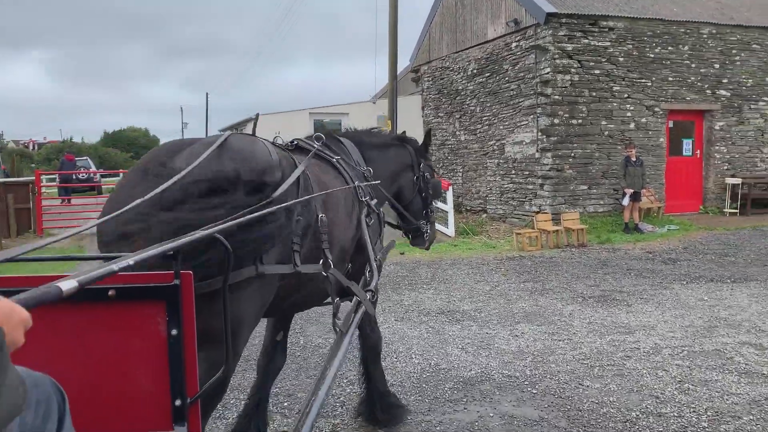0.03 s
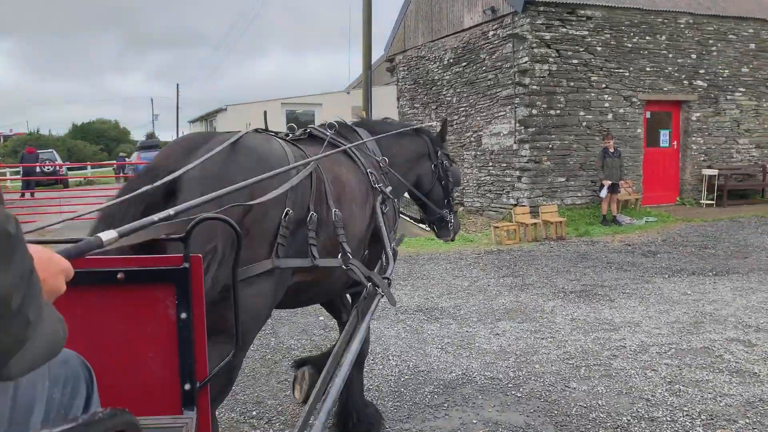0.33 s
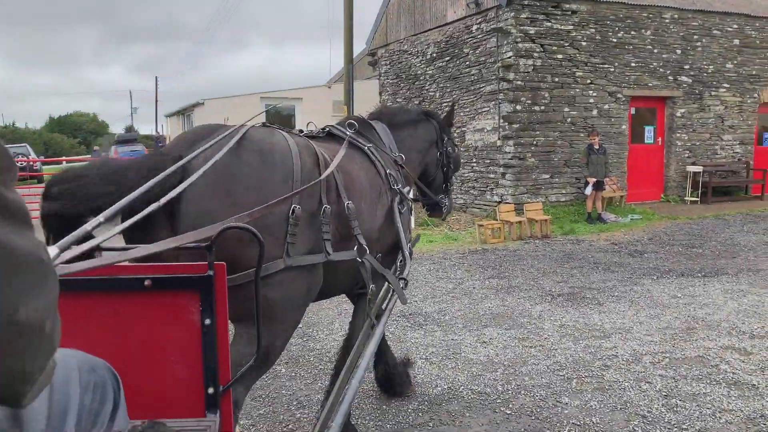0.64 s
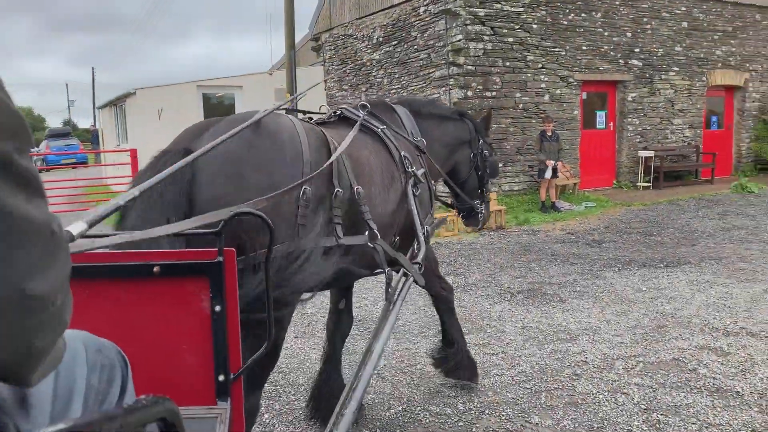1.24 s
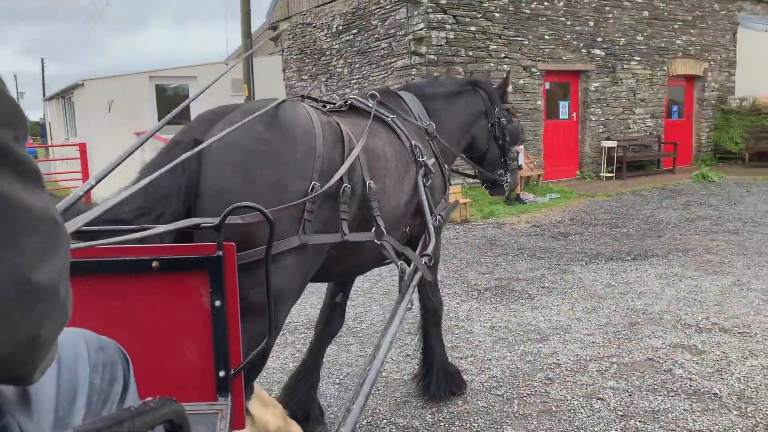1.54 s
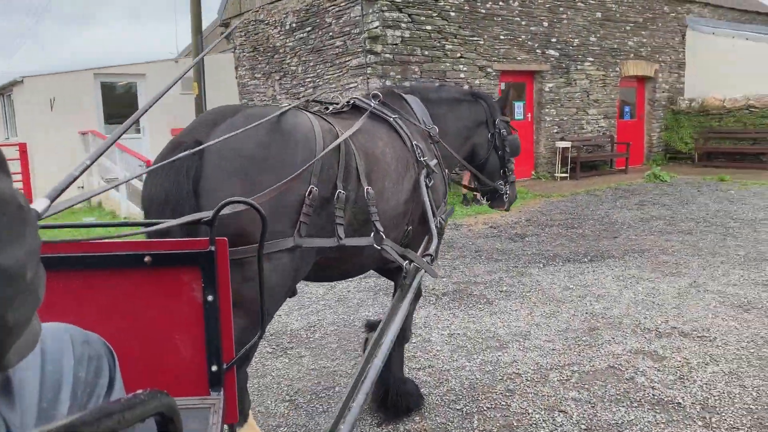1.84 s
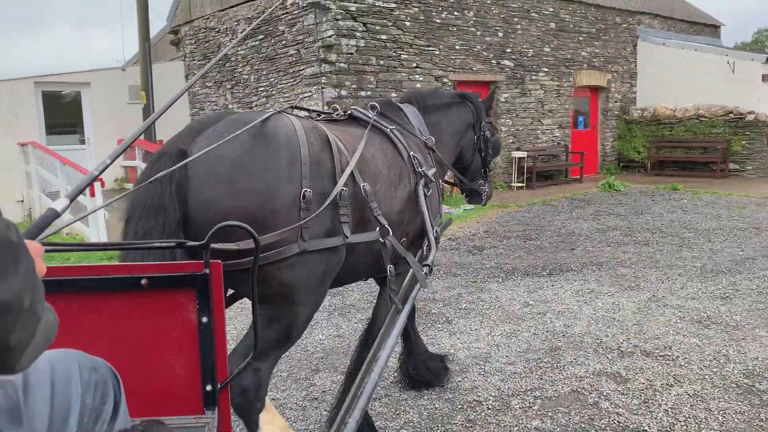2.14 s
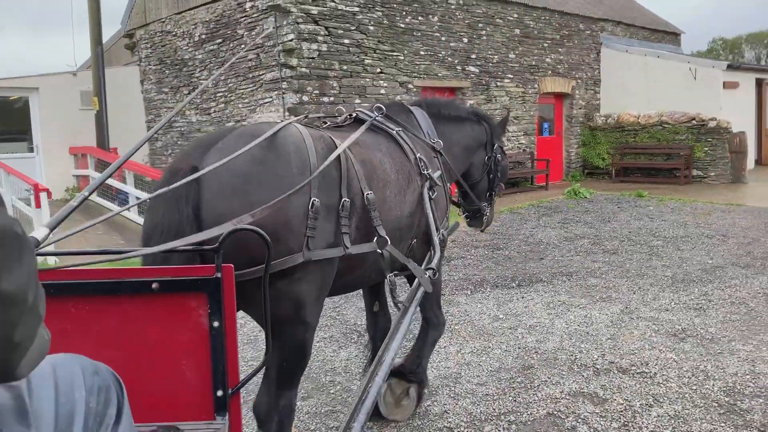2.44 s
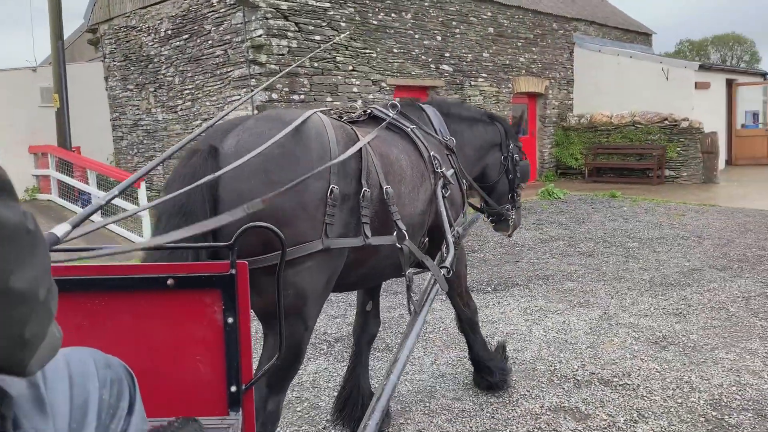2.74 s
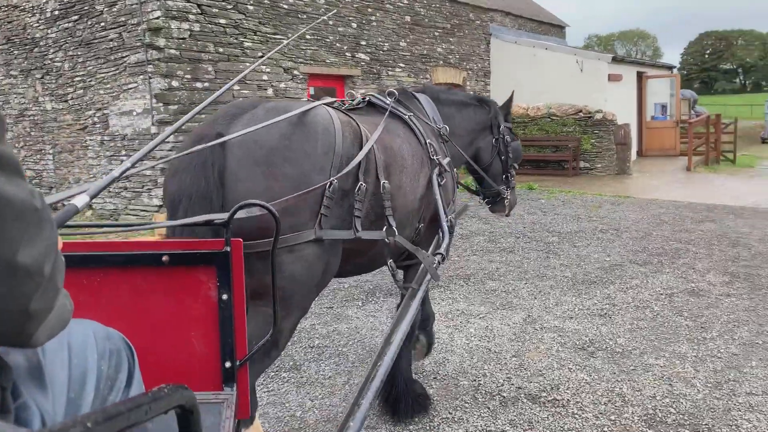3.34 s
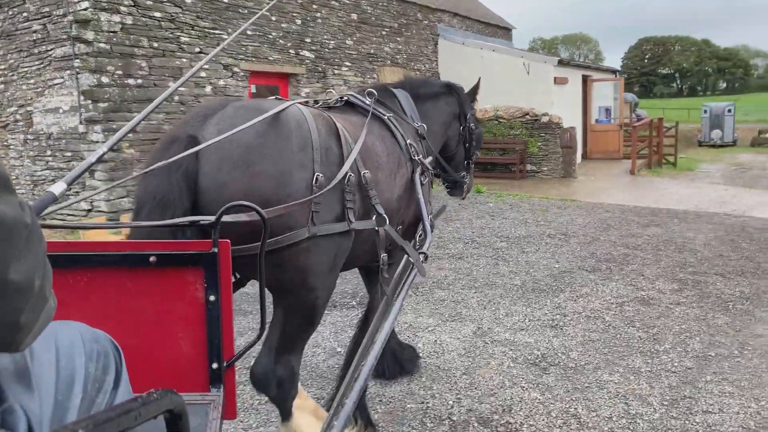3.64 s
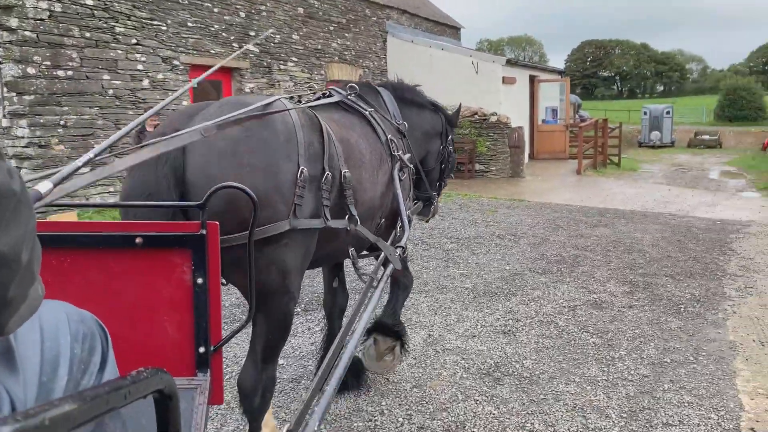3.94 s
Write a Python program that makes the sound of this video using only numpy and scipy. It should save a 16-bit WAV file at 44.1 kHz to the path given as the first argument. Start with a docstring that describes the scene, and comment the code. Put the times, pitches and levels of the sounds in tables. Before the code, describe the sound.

A horse walks on gravel throughout, each step a crunch, many with a hollow clop, the clearest near 0.3, 0.7, 1.7, 3.1 and 3.8 seconds. Pebbles snap and briefly scrape its iron shoes, while cart wheels crackle softly underneath and the yard gives a faint echo. Wind rumbles on the microphone, buffeting harder from about 1.8 seconds, with the strongest thumps near 2.2 and 3.2 seconds.

```python
"""A hoof crunches into gravel and lands with a hollow clop: a heavy horse pulls a cart across a yard
at a walk, heard from the driver's seat. Each crunch is a burst of colliding stones, each clop the
damped modes of a hoof. Stones scrape the iron shoes; pebbles snap under hooves and crackling wheels.
Turbulent wind buffets the microphone, harder in the second half; stone walls return a faint echo."""
import sys
import numpy as np
from scipy import signal
from scipy.fft import rfft, irfft
from scipy.io import wavfile
from scipy.ndimage import uniform_filter1d

SR = 44100
rng = np.random.default_rng(int(sys.argv[2]) if len(sys.argv) > 2 else 0)


def dump_mix(stems):
    """Bounce the given channels to the path in sys.argv[1] as a 16-bit WAV at rate SR."""
    frames = np.atleast_2d(stems).T  # one column per channel
    limited = np.clip(frames, -1, 1)  # hard clip at full scale
    pcm = np.round(limited * 32767).astype(np.int16)
    wavfile.write(sys.argv[1], SR, pcm)


N = 176400
T = np.arange(N) / SR
HZ = np.fft.rfftfreq(N, 1 / SR)
LEFT_RIGHT = np.array([[1], [-1]])  # opposite signs for the two channels


def crunches():
    """Source and filter: a hoof sets off dense stone impacts that ring its shoe, then settle."""
    # hooves crushing gravel: (time [s], length [s], level [dB], treble tilt [dB/octave])
    steps = [(0.0, 0.047, -38.5, 0.5), (0.2179, 0.028, -25, 0.5), (0.273, 0.04, -35, 7.5),
             (0.678, 0.013, -34, 1), (0.971, 0.038, -33, 4), (1.326, 0.014, -41, -1.5),
             (1.395, 0.034, -39, -9), (1.671, 0.055, -29.5, 2.5), (2.125, 0.026, -38, 0.5),
             (2.161, 0.017, -33, -14), (2.275, 0.0067, -35.5, -5), (2.394, 0.03, -34, 2.5),
             (2.838, 0.011, -32.5, -1.5), (3.0942, 0.03, -24, 1), (3.114, 0.044, -29, 0.5),
             (3.555, 0.037, -40.5, 4), (3.817, 0.0052, -29.5, 9.5), (3.835, 0.021, -28.5, 2.5)]
    # spectrum of crushed gravel: (frequency [Hz], level [dB])
    gravel = [(150, -18.5), (450, 9.5), (1100, 4), (1700, -0.5), (2500, -6), (3100, -4), (4400, -3),
              (5500, -10.5), (7500, -7), (10500, -16.5), (14000, -25)]
    # resonances of the iron shoe: (frequency [Hz], width [Hz], boost [dB])
    shoe = [(2215, 600, 7.5), (3474, 180, 7), (4330, 410, 3.5)]
    rise_s, fall_s, settle_s, settle_db = 0.0013, 0.0084, 0.07, -18.5
    out, t = np.zeros(N), T[:SR // 4]
    body_db = read(gravel) + sum(db / (1 + (2 * (HZ - hz) / width) ** 2) for hz, width, db in shoe)
    for start, length, db, tilt in steps:
        after = np.maximum(t - length, 0)
        decay = np.exp(-after / fall_s) + amp(settle_db) * np.exp(-after / settle_s)
        envelope = (1 - np.exp(-t / rise_s)) * decay
        impacts = stones(len(t), per_s=15000, spread_db=3, clump_db=2.5, click_db=-7.5)
        burst = colour(impacts * envelope, body_db + tilt * np.log2(HZ / 3000 + 0.13))
        add(out, start, amp(db) * unit(burst) * np.sqrt(np.mean(envelope ** 2)))
    return out


def stones(size, per_s, spread_db, clump_db, click_db):
    """Impulse-driven resonators: stones knock in clumps and ring at their own pitch; some only click."""
    pitches_hz, quality = np.geomspace(447.3, 14050, num=36), 17
    hz = np.fft.rfftfreq(size, 1 / SR) + 1
    knots_s = np.arange(0, N / SR, .03)
    spectrum = amp(click_db) * rfft(grains(size, per_s / 20, spread_db))
    for family in pitches_hz.reshape(-1, 4):  # neighbouring pitches swell together
        clump = amp(clump_db * np.interp(T[:size], knots_s, rng.standard_normal(len(knots_s))))
        for pitch in family:
            knocks = clump * grains(size, per_s / len(pitches_hz), spread_db)
            spectrum += rfft(knocks) / (1 + 1j * quality * (hz / pitch - pitch / hz))
    return unit(irfft(spectrum, size))


def clops():
    """Modal ringing: the hollow hoof lands flat and vibrates as a sum of damped sinusoids."""
    # hoof landings: (time [s], level [dB], pitch [Hz], decay by 60 dB [s])
    landings = [(.047, -26, 713, 0.036), (.2925, -15, 714, 0.049), (.306, -22, 615, 0.055),
                (.6895, -18, 790, 0.045), (.710, -27, 670, 0.018), (1.006, -27, 748, 0.046),
                (1.4245, -22, 714, 0.026), (1.704, -23, 757, 0.046), (1.724, -22.5, 742, 0.1),
                (1.739, -29.5, 723, 0.099), (2.406, -27, 707, 0.028), (3.134, -21, 762, 0.11),
                (3.843, -21, 716, 0.11), (3.908, -25.5, 700, 0.036)]
    # hoof modes: (frequency / pitch [ratio], level [dB], share of the decay time [ratio])
    modes = [(.56, -9, 0.6), (1, 2.5, 1), (1.22, -6.5, 0.24), (1.66, -8, 0.38)]
    out, t = np.zeros(N), T[:SR // 4]
    attack = 1 - np.exp(-t / 0.000043)
    for start, db, hz, t60 in landings:
        ring = sum(amp(mode_db - 60 * t / (t60 * share)) * np.sin(2 * np.pi * hz * ratio * t)
                   for ratio, mode_db, share in modes)
        add(out, start, amp(db) * ring * attack)
    return out


def scrapes():
    """Friction excitation: a stone slips along the shoe; one iron mode sings unevenly, then dies."""
    # stones grinding on iron: (time [s], length [s], peak level [dB], pitch [Hz])
    slips = [(0.194, 0.0064, -29, 1280), (.231, 0.018, -21, 2244), (0.232, .013, -35, 4540),
             (1.669, 0.023, -20, 2100), (1.699, 0.029, -30.5, 4480), (1.838, 0.002, -25.5, 3800),
             (1.841, 0.00063, -20.5, 4470), (2.832, 0.0077, -27.5, 1230), (3.094, 0.012, -18, 2157),
             (3.098, .014, -21, 2674), (3.144, 0.017, -21.5, 4290), (3.837, 0.0086, -20.5, 1420)]
    ring_s, waver = 0.0017, 0.019
    out, t = np.zeros(N), T[:SR // 10]
    for start, length, db, hz in slips:
        slip = drift(len(t), seconds=0.00079)
        envelope = np.exp(-np.maximum(t - length, 0) / ring_s) * amp(3.1 * slip)
        tone = np.sin(2 * np.pi * hz * np.cumsum(1 + waver * slip) / SR)
        add(out, start, amp(db) * envelope / envelope.max() * tone)
    return out


def snaps():
    """Impact and free vibration: a pinched pebble cracks against its neighbours, which ring briefly."""
    # single pebbles snapping: (time [s], level [dB], centre frequency [Hz])
    pebbles = [(0.0392, -23, 6400), (.277, -20, 4300), (.288, -14.5, 6400), (0.6268, -28, 4380),
               (.6895, -17, 3530), (1.242, -30, 3700), (1.3953, -25.5, 4080), (1.4232, -22, 3550),
               (1.6292, -24, 2450), (1.8391, -16, 4290), (2.1491, -20, 4400), (2.187, -22.5, 1490),
               (2.391, -16.5, 4500), (2.4063, -13, 4270), (2.5507, -30.5, 9800), (2.756, -24.5, 1140),
               (2.8461, -23.5, 3880), (2.9231, -26.5, 2170), (3.5848, -24, 5000), (3.654, -19.5, 5160),
               (3.908, -25.5, 3080)]
    crack_s, ring_s, ring_db, spread_octaves, floor_db = 0.0015, 0.0057, -15.5, 0.72, -31
    out, t = np.zeros(N), T[:SR // 10]
    for start, db, hz in pebbles:
        modes_hz = hz * 2 ** (spread_octaves * rng.uniform(-1, 1, size=(6, 1)))
        ring = unit(np.sin(2 * np.pi * modes_hz * t).sum(0)) * np.exp(-t / ring_s)
        band_db = np.maximum(-3 * (np.log2((HZ + 1) / hz) / spread_octaves) ** 2, floor_db)
        crack = colour(rng.standard_normal(len(t)) * np.exp(-t / crack_s), band_db)
        add(out, start, amp(db) * (crack / abs(crack).max() + amp(ring_db) * ring))
    return out


def wheels():
    """Rolling noise: the wheels press an uneven crackle and a hiss out of the gravel."""
    # strength of the rolling noise: (time [s], level [dB])
    rolling = [(0, -58.5), (.15, -43.5), (.38, -42.5), (.58, -48.5), (.8, -50), (.92, -46), (1.15, -48),
               (1.3, -46), (1.5, -46), (1.65, -41.5), (2.0, -48.5), (2.3, -44), (2.65, -51), (3.0, -44),
               (3.35, -42.5), (3.5, -47.5), (3.75, -41), (4, -42.5)]
    # spectrum of gravel under the wheels: (frequency [Hz], level [dB])
    spectrum = [(100, -23), (300, 3), (700, 7.5), (1000, 1.5), (1280, 7), (1700, -0.5), (2300, 0.5),
                (3300, -8.5), (4300, -6), (6000, -12), (9500, -16), (14000, -25.5)]
    crackle = stones(N, per_s=4500, spread_db=3, clump_db=8.5, click_db=-24)
    hiss = amp(-5) * rng.standard_normal(N)
    return level(rolling) * unit(colour(crackle + hiss, read(spectrum)))


def wind():
    """Turbulent pressure follows the gusts, only partly coherent between the microphone's two ports."""
    # gusts at the microphone: (time [s], level [dB])
    gusts = [(0, -31), (.32, -29.5), (.52, -43.5), (.76, -45), (.82, -37.5), (1.1, -31.5), (1.5, -42),
             (1.76, -34.5), (1.8, -19.5), (1.95, -22), (2.07, -26.5), (2.19, -10), (2.26, -31),
             (2.37, -22.5), (2.47, -31), (2.8, -23.5), (3.08, -28), (3.22, -16), (3.38, -27), (3.58, -19.5),
             (3.68, -30.5), (3.92, -22)]
    # single strong buffets: (time [s], level [dB], starting pitch [Hz])
    thumps = [(.024, -17.5, 333), (1.422, -25, 765), (1.573, -23.5, 306), (1.787, -21, 540),
              (1.847, -19, 463), (1.937, -22, 472), (2.012, -12, 439), (2.049, -31.5, 670),
              (2.103, -14.5, 490), (2.168, -11.5, 523), (2.188, -11, 392), (2.297, -23.5, 700),
              (2.338, -18, 426), (2.372, -17, 303), (2.595, -23.5, 676), (2.932, -18.5, 480),
              (3.199, -9, 266), (3.243, -13.5, 449), (3.266, -10.5, 260), (3.547, -12.5, 547),
              (3.576, -20, 608), (3.61, -14.5, 720), (3.984, -14, 810)]
    common = level(gusts) * turbulence()
    for start, db, hz in thumps:
        add(common, start, amp(db) * buffet(hz))
    opposed = amp(-10) * level(gusts) * turbulence()
    return common + LEFT_RIGHT * opposed


def buffet(start_hz):
    """Pressure pulse: a large eddy hits the microphone with a ragged thump that sinks in pitch."""
    rise_s, fall_s, sag_s, end_hz, roughness = 0.0038, 0.011, 0.00755, 66, 0.4
    t = T[:SR // 8]
    pitch = end_hz + (start_hz - end_hz) * np.exp(-t / sag_s)
    tone = np.sin(2 * np.pi * np.cumsum(pitch) / SR)
    envelope = (1 - np.exp(-(t / rise_s) ** 2)) * np.exp(-t / fall_s)
    return envelope / envelope.max() * (tone + roughness * drift(len(t), seconds=0.92 / start_hz))


def turbulence():
    """Random pressure fluctuation: a low rumble under a dense flutter of small eddies."""
    # spectrum of the wind's rumble: (frequency [Hz], level [dB])
    spectrum = [(20, -32), (40, -8), (65, 2), (115, -4.5), (170, -16), (280, -21), (450, -30), (800, -46),
                (2000, -78.5)]
    eddies_per_s, eddy_db = 260, -4.5
    rumble = irfft(rfft(rng.standard_normal(N)) * amp(read(spectrum)), N)
    speeds = np.geomspace(.5, 1.7, num=8)
    flutter = np.zeros(N)
    for speed in speeds:
        arrivals = grains(N, eddies_per_s / len(speeds), spread_db=3.2)
        flutter += signal.oaconvolve(arrivals, eddy(speed))[:N]
    return unit(rumble) + amp(eddy_db) * unit(flutter)


def eddy(speed):
    """Time scaling: a small eddy is a blip of a cycle or two, shorter and higher the faster it passes."""
    start_hz, decay_s = 335.7, 0.0022  # at a relative speed of 1
    t = T[:SR // 16] * speed
    envelope = t / decay_s * np.exp(-t / decay_s)
    return envelope * np.sin(2 * np.pi * start_hz * t / (1 + t / 0.023)) / speed


def yard(x):
    """Reverberation: the stone walls return a decaying tail, different on each side."""
    low_decay, high_decay = (200, 0.8), (1000, .24)  # (frequency [Hz], decay by 60 dB [s])
    hz, t, noise = signal.stft(rng.standard_normal((2, SR // 2)), SR, nperseg=256)
    t60 = read([low_decay, high_decay], hz)[:, None]
    envelope = amp(-60 * t / t60) * np.minimum(t / 0.0058, 1)
    tail = signal.istft(noise * envelope, SR, nperseg=256)[1]
    return signal.fftconvolve(x[None], tail / np.linalg.norm(tail[0]), axes=1)[:, :N]


def ports(x):
    """Path difference: scattered stones and their echo reach each port with their own phase and level."""
    # phase of sound from the ground ahead: (frequency [Hz], lead of the left port [rad])
    phase = [(200, .1), (1000, .6), (1800, 1.4), (4300, 1.3), (7700, 2.1), (9400, 0), (13600, -6.1),
             (15700, -8)]
    # balance of the ports: (frequency [Hz], left minus right [dB])
    balance = [(300, 1), (1600, -1.5), (2300, -0.5), (4400, -4.5), (7000, -0.5)]
    # part of the sound that differs between the ports: (frequency [Hz], level [dB])
    incoherence = [(300, -7), (4300, -5.5), (9000, -15)]
    echo_db = -15.5
    hz, _, frames = signal.stft(x, SR, nperseg=128)
    random_phase = np.exp(2j * np.pi * rng.random(frames.shape[::-1]).T)
    scattered = frames * random_phase * amp(read(incoherence, hz))[:, None]
    scatter = signal.istft(scattered, SR, nperseg=128)[1][:N]
    arriving = x + LEFT_RIGHT * scatter + amp(echo_db) * yard(x)
    response = amp(LEFT_RIGHT * read(balance) / 2) * np.exp(.5j * LEFT_RIGHT * read(phase))
    return irfft(rfft(arriving) * response, N)


def wind_filter(x):
    """Side-channel high-pass: as strong rumble accumulates, sound folds to mono below a rising corner."""
    bass_hz, threshold_db, rest_hz, growth = 200, -27, 45, 3600
    mid, side = x.mean(0), (x[0] - x[1]) / 2
    bass = irfft(rfft(mid) * (HZ < bass_hz), N)
    power = uniform_filter1d(bass ** 2, size=SR // 10)
    excess_energy = np.cumsum(np.maximum(power - amp(threshold_db) ** 2, 0)) / SR
    hz, t, frames = signal.stft(side, SR, nperseg=1024)
    corner_hz = rest_hz + growth * np.sqrt(np.interp(t, T, excess_energy))
    side = signal.istft(frames / np.sqrt(1 + (corner_hz / (hz[:, None] + 1)) ** 10), SR)[1][:N]
    return np.array([mid + side, mid - side])


def grains(size, per_s, spread_db):
    """Poisson process: random clicks, most small and a few large."""
    when, force = rng.random((2, size))
    hit, out = when < per_s / SR, np.zeros(size)
    signed = 2 * force[hit] - 1
    out[hit] = np.sign(signed) * amp(spread_db * np.minimum(-np.log(abs(signed) + 1e-9), 4.5))
    return out


def drift(size, seconds):
    """Low-passed noise: a random wander of rms about 1 that changes over the given time."""
    return unit(irfft(rfft(rng.standard_normal(N)) * np.exp(-(HZ * seconds) ** 2), N))[:size]


def colour(x, db):
    """Minimum-phase filter with the given dB gain over HZ."""
    gain_db = np.interp(np.linspace(0, SR / 2, 2049), HZ, np.maximum(db, -100))
    cepstrum = irfft(gain_db * np.log(10) / 20)
    cepstrum[1:2048] *= 2  # folding onto positive time makes the filter causal
    cepstrum[2049:] = 0
    return signal.fftconvolve(x, irfft(np.exp(rfft(cepstrum))))[:len(x)]


def amp(db):
    """Decibels to amplitude ratio."""
    return 10 ** (np.asarray(db) / 20)


def unit(x):
    """Normalisation to rms 1."""
    return x / np.sqrt(np.mean(x ** 2) + 1e-20)


def read(points, hz=HZ):
    """Interpolation of a table on a log-frequency axis."""
    frequency, value = np.transpose(points)
    return np.interp(np.log(hz + 1), np.log(frequency), value)


def level(points):
    """Amplitude envelope from (time [s], level [dB]) points."""
    return amp(np.interp(T, *np.transpose(points)))


def add(mix, start_s, sound):
    """Superposition of a sound on the mix from its start time."""
    part = mix[max(round(start_s * SR), 0):][:len(sound)]
    part += sound[:len(part)]


def scene():
    """Superposition: hooves and wheels in the yard, wind at the microphone."""
    return ports(crunches() + scrapes() + clops() + snaps() + wheels()) + wind()


def record(dry):
    """Band limiting: a steep low-pass follows the wind filter."""
    edge_hz = 15900
    low_pass = signal.firwin(401, edge_hz, window=("kaiser", 9), fs=SR)
    return signal.oaconvolve(wind_filter(dry), low_pass[None], "same")


dry = scene()
out = record(dry)
dump_mix(out)
```